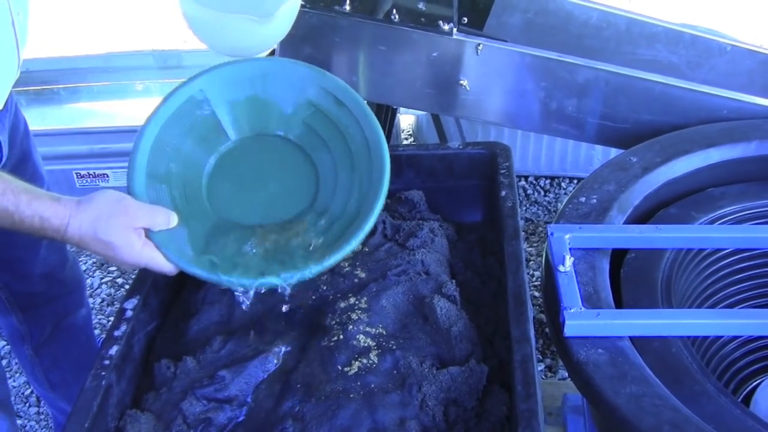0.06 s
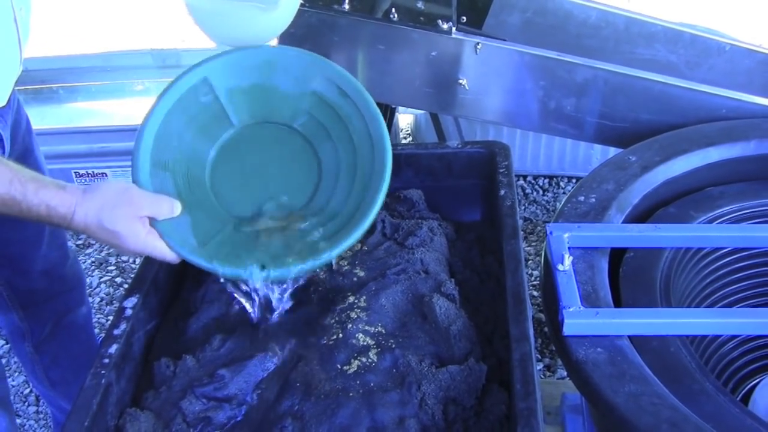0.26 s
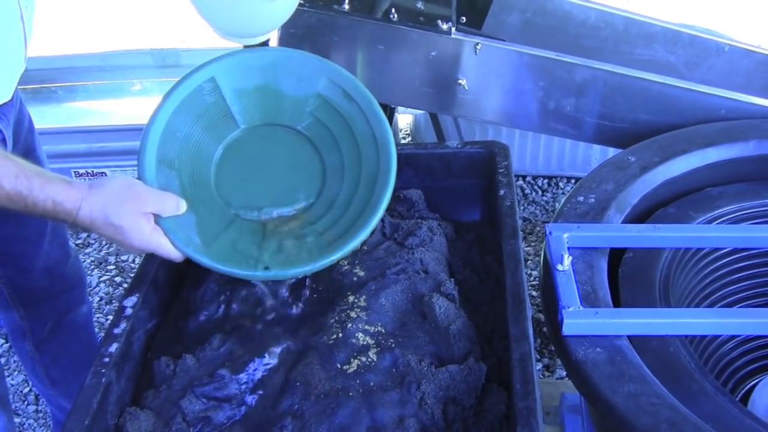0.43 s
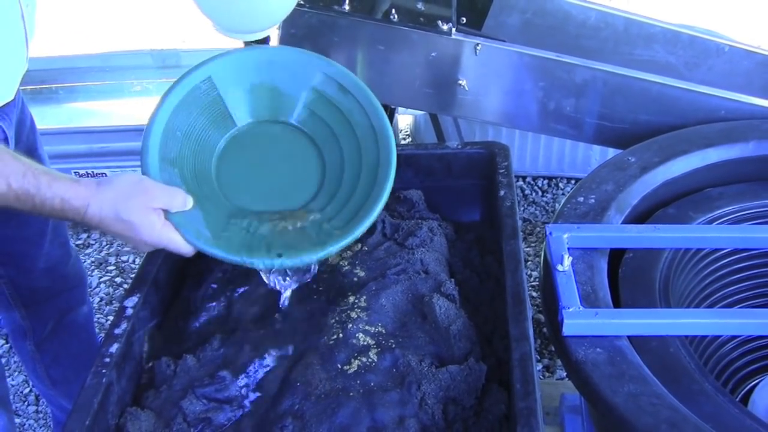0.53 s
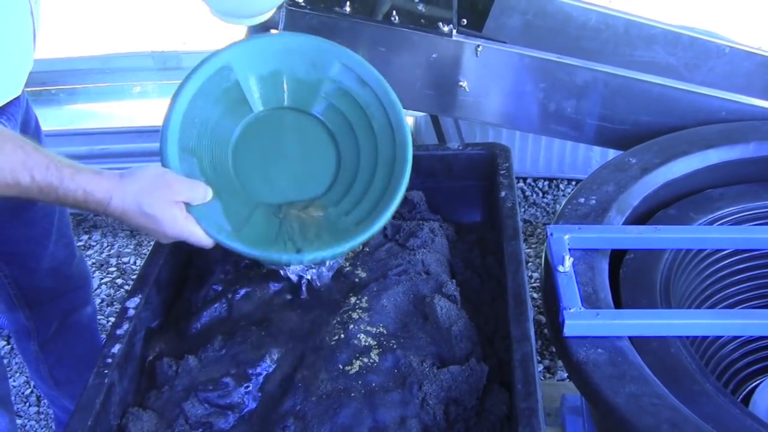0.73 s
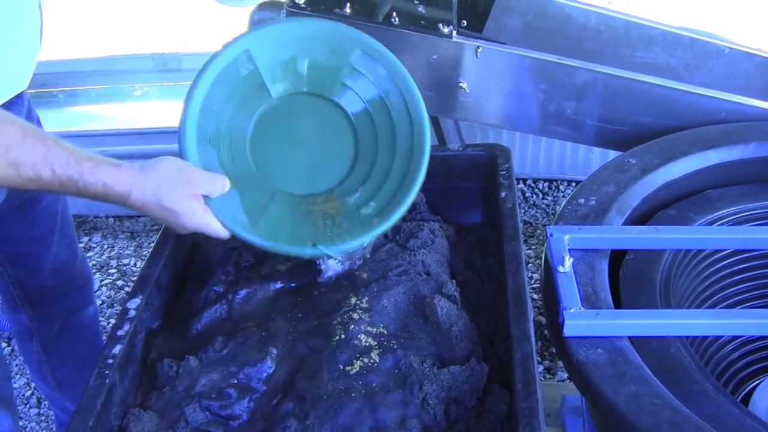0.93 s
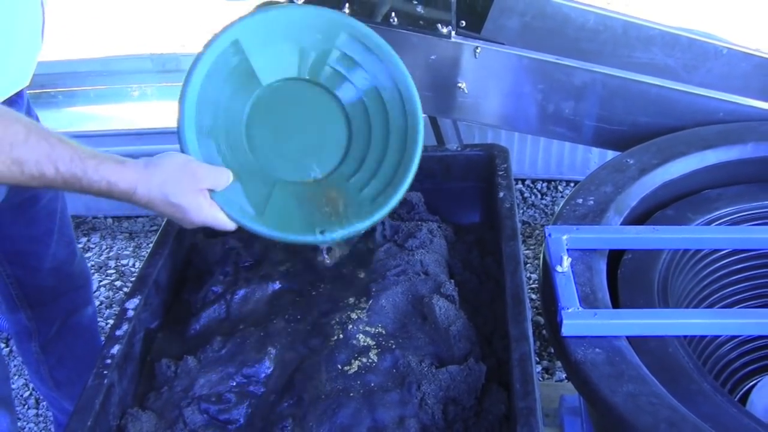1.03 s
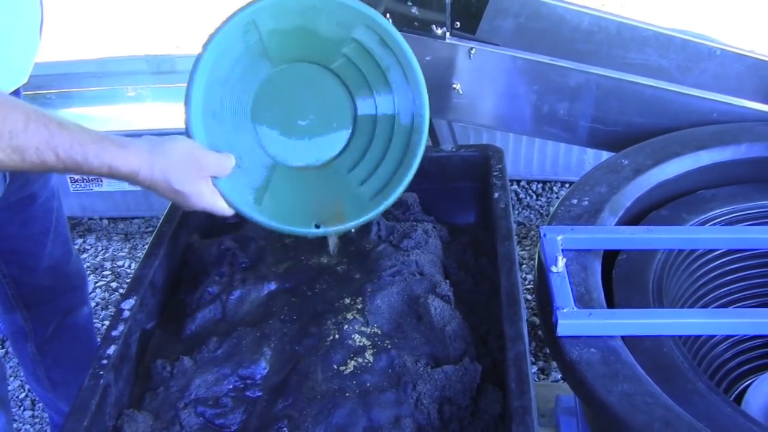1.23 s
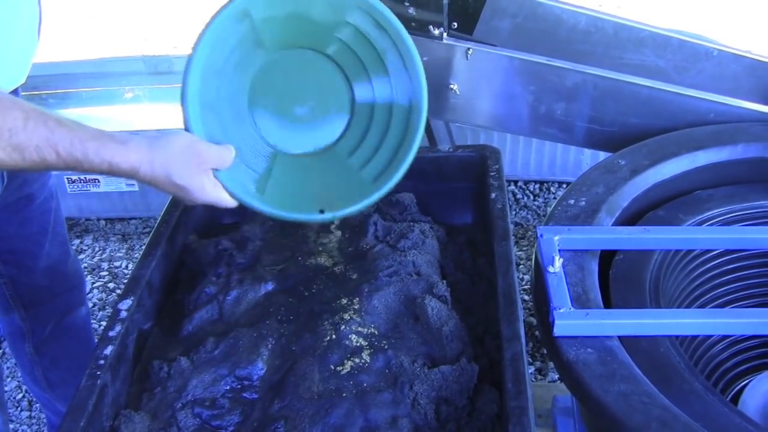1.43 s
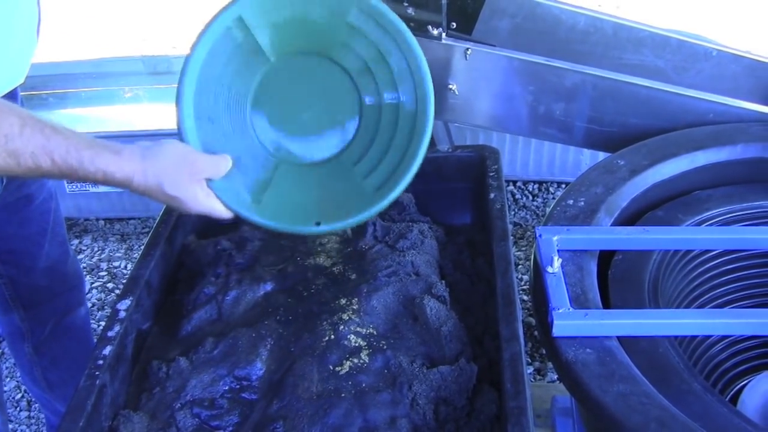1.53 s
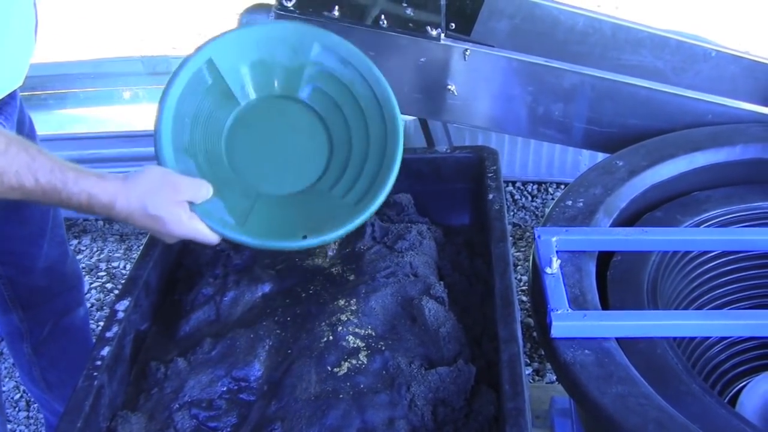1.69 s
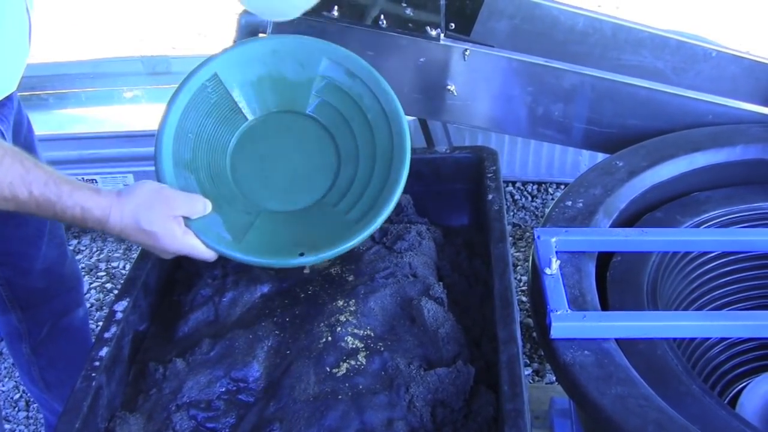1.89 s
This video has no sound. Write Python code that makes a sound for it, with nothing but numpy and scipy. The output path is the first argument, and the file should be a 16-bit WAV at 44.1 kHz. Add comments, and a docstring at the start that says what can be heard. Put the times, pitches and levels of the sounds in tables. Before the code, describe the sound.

Water drips close by from a plastic pan into a tub, ticking and plinking over a thin trickle, with one bright drop at 0.2 seconds. At 0.4 seconds a sharp, hollow knock briefly rings the tub. A pebble clacks near 1.1 seconds among gritty ticks. The dripping dries up, and wet clumps pat softly around 1.4 and 1.7 seconds. Soft outdoor noise and a faint distant hum lie underneath.

```python
"""Drops tick and plink over a thin trickle that dries up: water runs off the rim of a plastic pan
into a tub of wet sand, outdoors. Each drop is a tick, a ringing bubble and a splash.
One heavy blow rings the tub's modes, a pebble clacks, grit ticks and a few wet clumps pat down.
The tub walls add a short ring; a distant hum and soft outdoor noise lie under it."""
import sys
import numpy as np
from scipy import signal
from scipy.fft import rfft, irfft
from scipy.io import wavfile
from scipy.ndimage import uniform_filter1d

SR = 44100
rng = np.random.default_rng(int(sys.argv[2]) if len(sys.argv) > 2 else 0)


def wav_out(sig):
    """Save sig, one row per channel (or a flat mono array), as 16-bit PCM at SR to the path in sys.argv[1]."""
    wavfile.write(sys.argv[1], SR, np.round(np.clip(np.atleast_2d(sig).T, -1, 1) * 32767).astype(np.int16))


N = 85995
T = np.arange(N) / SR


def drops():
    """Single drops land in the tub."""
    # landings (time [s], pitch [Hz], level [dB], base decay [s])
    landings = [(.0635, 8900, -43, .008), (.236, 8220, -19, 0.007), (.2361, 5560, -32, .006),
                (.2365, 4600, -43.5, 0.025), (.2567, 2010, -39.5, 0.0089), (.2615, 8200, -46, .012),
                (.2635, 3540, -33, 0.013), (.2772, 3050, -45, .02), (.2862, 5160, -46, .012),
                (.3097, 3660, -50, .015), (.3355, 3600, -47, .015), (.3757, 4300, -43, 0.017),
                (.3802, 3240, -42, 0.038), (.4062, 7850, -33, 0.0044), (.4325, 3100, -36, .018),
                (.441, 4510, -32.5, 0.019), (.4415, 3440, -38, .014), (.4591, 8600, -37, 0.0075),
                (.4632, 4242, -46, 0.013), (.479, 3060, -44.5, .02), (.5229, 4800, -47, .012),
                (.533, 2180, -46.5, .025), (.668, 6804, -44, 0.0072), (.6917, 4460, -38.5, 0.016),
                (.7692, 7700, -41.5, 0.0065), (.8536, 8000, -46, 0.013), (.8616, 8100, -46, 0.018),
                (.867, 5240, -42.5, 0.015), (.8932, 3770, -45, 0.022), (.907, 3337, -48, .02),
                (.9183, 2131, -41.5, .025), (1.0378, 3560, -32.5, 0.0097), (1.0578, 8800, -27, 0.0034),
                (1.1005, 6287, -44, 0.023), (1.1084, 10000, -37.5, .012), (1.1438, 9173, -40.5, .009),
                (1.1877, 4480, -34.5, 0.0072), (1.2467, 5700, -38, 0.013), (1.2622, 10300, -45, .008),
                (1.2878, 7100, -45.5, .01), (1.3097, 7730, -44, .01), (1.3748, 6940, -47.5, 0.0078)]
    out = np.zeros(N)
    for start, hz, db, decay_s in landings:
        add(out, start, undb(db) * drop(hz, decay_s))
    return out


def drop(hz, decay_s):
    """A tick, a tiny bubble whose pitch rises, and a burst of splash around that pitch."""
    rise_s, glide_per_s = 0.00025, 1.8
    bubble_db, tick_db, splash_db = -1.5, -14, -9.5
    age = T[:N // 20]
    tick = band_noise(len(age), hz, half_width_oct=1) * decay(age, t60_s=0.0042)
    splash = band_noise(len(age), hz, half_width_oct=0.22) * decay(age, t60_s=1.73 * decay_s)
    envelope = (1 - np.exp(-age / rise_s)) * decay(age, t60_s=0.77 * decay_s)
    bubble = envelope / envelope.max() * np.sin(2 * np.pi * hz * age * (1 + glide_per_s * age / 2))
    return undb(bubble_db) * bubble + undb(tick_db) * tick + undb(splash_db) * splash


def trickle():
    """Fine patter and bubbles that follow the flow."""
    # flow (time [s], level [dB])
    flow_curve = [(0, -61), (.2, -62.5), (.38, -57), (.64, -60.5), (.87, -63), (1.0, -63.5), (1.2, -61.5),
                  (1.4, -67), (1.6, -69), (1.95, -73.5)]
    # patter spectrum (frequency [Hz], gain [dB])
    spectrum = [(800, -16), (2000, -1.5), (3500, -0.5), (6000, -4), (8800, -1.5), (10500, -6), (12500, -8),
                (15000, -14)]
    return undb(curve(flow_curve)) * (droplets(spectrum) + fizz())


def spray():
    """Fine droplets die away after a splash."""
    # splashes (time [s], level [dB], t60 [s])
    splashes = [(.238, -58, .13), (0.257, -51, 0.076), (0.404, -47.5, 0.31), (1.06, -44.5, 0.16),
                (1.094, -54, .09), (1.247, -53, 0.16)]
    # spray spectrum (frequency [Hz], gain [dB])
    spectrum = [(500, -1.5), (2200, 0), (4500, -0.5), (7500, -6), (10000, -9), (12000, -13), (15000, -29)]
    return bursts(splashes) * droplets(spectrum)


def droplets(spectrum, rate_per_s=2000, spread_db=1):
    """Dense tiny clicks of uneven size, rms 1."""
    hits = rng.random(N) < rate_per_s / SR
    size = undb(spread_db * np.minimum(rng.exponential(size=N), 5))
    return unit(colour(hits * size * rng.choice([-1, 1], N), spectrum))


def fizz(rate_per_s=150, low_hz=2237, high_hz=9970):
    """Many small bubbles of random size; the higher ones die sooner."""
    base_db, spread_db, t60_cycles = 7, 2.5, 30
    out, age = np.zeros(N), T[:N // 100]
    for when, pitch, strength in rng.random((int(rate_per_s * N / SR), 3)):
        hz = low_hz * (high_hz / low_hz) ** pitch
        db = base_db + spread_db * min(-np.log(1 - strength), 2)
        bubble = decay(age, t60_cycles / hz) * np.sin(2 * np.pi * hz * age)
        add(out, when * N / SR, undb(db) * bubble)
    return out


def knock(start_s=0.4007, crack_db=-19.5, low_cut_hz=98):
    """A slap and crack, then the plastic tub rings; its thin wall radiates little bass."""
    # tub modes (frequency [Hz], level [dB], t60 [s])
    tub_modes = [(135, -31, 0.076), (181, -26, .065), (232, -27, 0.045), (282.7, -22, 0.15),
                 (463, -26, 0.089), (730, -36, .04), (774.5, -19.5, 0.06), (852, -18, 0.075),
                 (925, -31, 0.038), (1140, -29.5, .048), (1203, -24.5, 0.033), (1252, -26.5, 0.041),
                 (1412, -23.5, 0.047), (1590, -35, 0.036), (1770, -33, 0.07), (2016, -28, 0.043),
                 (2310, -26, 0.041)]
    # short, broad rings of the slap (frequency [Hz], level [dB], t60 [s])
    slap_modes = [(1230, -10, 0.017), (2186, -22, 0.013), (2540, -24, .018), (3050, -28, 0.013),
                  (4580, -27.5, 0.0068)]
    # crack spectrum (frequency [Hz], gain [dB])
    spectrum = [(60, -17), (200, 0), (700, -0.5), (2400, 4.5), (3600, -9.5), (6000, -16.5), (10000, -26),
                (15000, -52)]
    crack = undb(crack_db) * fade(start_s, t60_s=0.023) * noise(spectrum)
    blow = ring(start_s, tub_modes) - ring(start_s, slap_modes) + crack
    return butterworth(blow, low_cut_hz, "high", order=2)


def clack(start_s=1.0594):
    """A pebble's lighter strike rings briefly."""
    # modes (frequency [Hz], level [dB], t60 [s])
    modes = [(1124, -33, 0.019), (1550, -27, 0.011), (2227, -20.5, 0.018), (3170, -33.5, 0.015),
             (6540, -31, .014), (7470, -34, 0.016), (9640, -31, 0.0059)]
    return ring(start_s, modes)


def pats():
    """Wet clumps land dull and dead on sand."""
    # landings (time [s], level [dB], t60 [s])
    landings = [(.479, -43, .02), (1.157, -46, 0.035), (1.4284, -38, 0.052), (1.444, -50.5, 0.1),
                (1.7094, -40, .016)]
    # pat spectrum (frequency [Hz], gain [dB])
    spectrum = [(60, -20), (200, -1), (550, -3), (900, 1), (1400, 5), (2000, -11), (3500, -19),
                (8000, -21.5), (15000, -22)]
    return butterworth(noise(spectrum) * bursts(landings), [250, 7000], "band", order=1)


def grit(t60_s=0.0034):
    """Grains of grit strike the plastic with dry, bright ticks."""
    # strikes (time [s], level [dB])
    strikes = [(0.4009, -34), (0.406, -35), (.441, -29.5), (.4592, -36.5), (.7693, -40), (.8672, -40.5),
               (.981, -44), (1.037, -43), (1.1882, -51), (1.245, -33)]
    # tick spectrum (frequency [Hz], gain [dB])
    spectrum = [(1000, -6), (3000, -5), (5000, -2.5), (8500, 0), (11000, -10), (15000, -6.5)]
    return noise(spectrum) * bursts((start, db, t60_s) for start, db in strikes)


def walls(x, level_db=-16, side_db=-12):
    """Short diffuse reflections from the tub and the things around it."""
    tails = rng.standard_normal((2, N)) * fade(start_s=0.003, t60_s=0.11)
    mid, side = (signal.fftconvolve(x, tail / np.linalg.norm(tail))[:N] for tail in tails)
    return undb(level_db) * stereo(mid, undb(side_db) * side)


def air(level_db=-52):
    """Soft, wide outdoor noise."""
    # noise spectrum (frequency [Hz], gain [dB])
    spectrum = [(25, -16), (60, -9.5), (100, -2.5), (125, -3.5), (150, -6), (200, -4), (280, -6.5),
                (350, -9), (500, -8.5), (650, -13.5), (900, -10.5), (1150, -14), (1500, -19.5),
                (2400, -25.5), (5000, -33.5), (9000, -40.5), (12000, -42), (15500, -49)]
    # side relative to mid (frequency [Hz], gain [dB])
    width = [(30, -3), (70, -16), (200, -7), (1000, -5), (4000, -1.5), (8000, -8.5), (13000, 1.5)]
    return undb(level_db) * stereo(noise(spectrum), colour(noise(spectrum), width))


def hum(level_db=-60.5, waver_db=2, smooth_samples=2500):
    """A distant low tone wavers in pitch and level."""
    # pitch (time [s], frequency [Hz])
    pitch = [(0, 185), (.5, 184), (.64, 162.1), (.95, 162.1), (1.1, 165.9), (1.25, 184.8), (1.4, 181.7),
             (1.5, 164), (1.6, 168), (1.7, 184), (1.95, 183)]
    drift = uniform_filter1d(rng.standard_normal(N), smooth_samples)
    waver = unit(uniform_filter1d(drift, smooth_samples))
    tone = np.sqrt(2) * np.sin(2 * np.pi * np.cumsum(curve(pitch)) / SR)
    return undb(level_db + waver_db * waver) * tone


def ports(x, lag_s=0.0001):
    """Two close microphone ports: alike in the bass, apart in the treble."""
    # side relative to mid (frequency [Hz], gain [dB])
    width = [(500, -47), (2000, -45), (5000, -33), (8500, -21), (13000, -11)]
    delayed = np.interp(T - lag_s, T, x)
    return stereo(x, colour(delayed, width))


def undb(db):
    """Decibels to gain."""
    return 10 ** (np.asarray(db) / 20)


def unit(x):
    """Scale to rms 1."""
    return x / np.sqrt(np.mean(x ** 2))


def curve(points):
    """Interpolate (time [s], value) points at every sample."""
    return np.interp(T, *np.array(points).T)


def colour(x, spectrum):
    """Filter by a (frequency [Hz], gain [dB]) curve."""
    hz, db = np.array(spectrum, float).T
    bins_hz = np.maximum(np.arange(N // 2 + 1) * SR / N, 1)
    return irfft(rfft(x) * undb(np.interp(np.log(bins_hz), np.log(hz), db)), N)


def butterworth(x, edges_hz, kind, order):
    """Filter with a flat passband."""
    return signal.sosfilt(signal.butter(order, edges_hz, kind, fs=SR, output="sos"), x)


def noise(spectrum):
    """Coloured noise, rms 1."""
    return unit(colour(rng.standard_normal(N), spectrum))


def band_noise(samples, hz, half_width_oct, top_hz=10800):
    """Noise around a pitch, rms 1."""
    edges_hz = [hz / 2 ** half_width_oct, min(hz * 2 ** half_width_oct, top_hz)]
    return unit(butterworth(rng.standard_normal(samples), edges_hz, "band", order=2))


def decay(age_s, t60_s):
    """Exponential fall, 60 dB per t60."""
    return np.exp(-np.log(1000) * age_s / t60_s)


def fade(start_s, t60_s):
    """Sudden onset, exponential decay."""
    return (T >= start_s) * decay(np.clip(T - start_s, 0, 4 * t60_s), t60_s)


def bursts(events):
    """Summed envelope of (time [s], level [dB], t60 [s]) events."""
    return sum(undb(db) * fade(start, t60) for start, db, t60 in events)


def ring(start_s, modes):
    """Damped modes of alternating sign, struck together."""
    return sum((-1) ** k * undb(db) * fade(start_s, t60) * np.sin(2 * np.pi * hz * (T - start_s))
               for k, (hz, db, t60) in enumerate(modes))


def add(out, start_s, x):
    """Mix a short sound in at its time."""
    i = int(start_s * SR)
    out[i:i + len(x)] += x[:N - i]


def stereo(mid, side):
    """Left and right from mid and side."""
    return np.array([mid + side, mid - side])


def scene():
    """Water and blows straight ahead, in the open air."""
    # treble roll-off that softens the close water and blows (frequency [Hz], gain [dB])
    soft_top = [(9800, 0), (12000, -7), (13500, -9), (15500, -28)]
    background = air() + hum()
    blows = colour(knock() + clack() + pats() + grit(), soft_top)
    water = colour(drops() + spray() + trickle(), soft_top)
    balance = undb([[-0.2], [0.2]])  # left, right
    return balance * ports(water) + ports(blows) + walls(water + blows) + background


def record(dry, top_hz=15700):
    """Steep low-pass on the highest treble."""
    return signal.sosfilt(signal.ellip(10, .2, 70, top_hz, fs=SR, output="sos"), dry)


dry = scene()
out = record(dry)
wav_out(out)
```